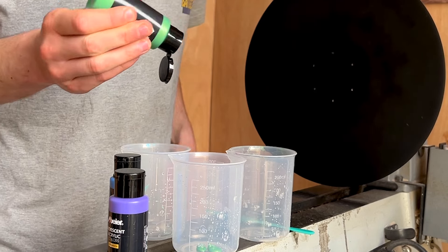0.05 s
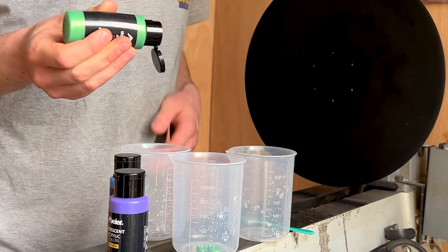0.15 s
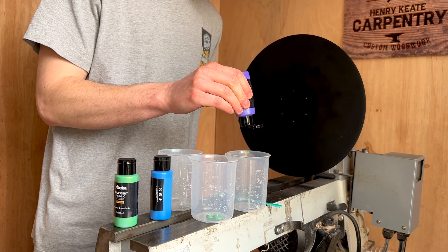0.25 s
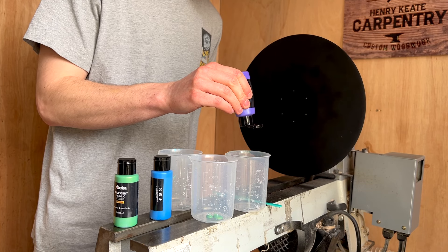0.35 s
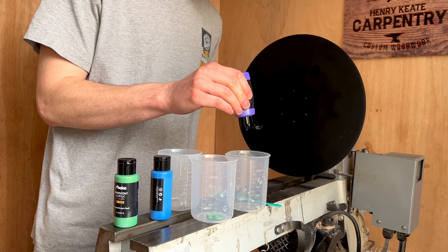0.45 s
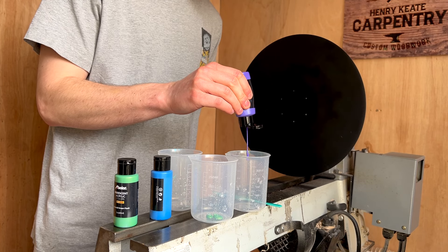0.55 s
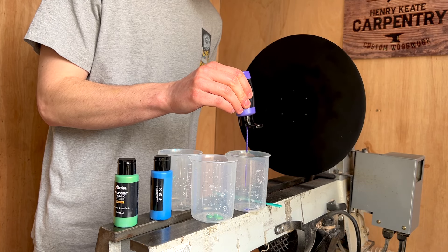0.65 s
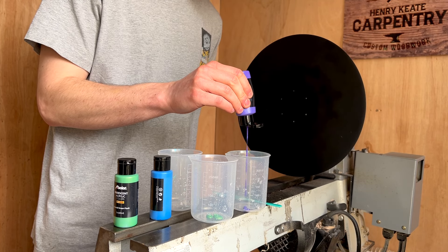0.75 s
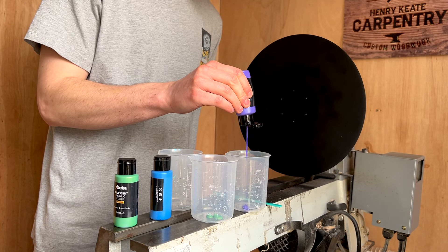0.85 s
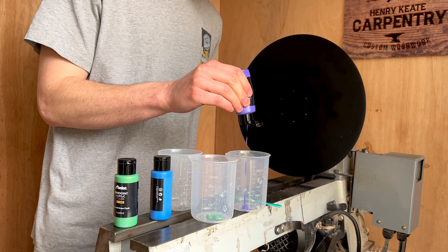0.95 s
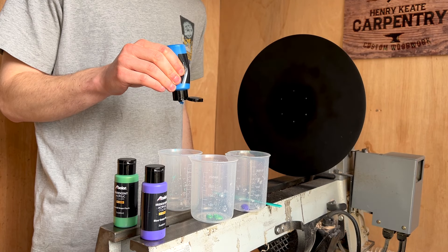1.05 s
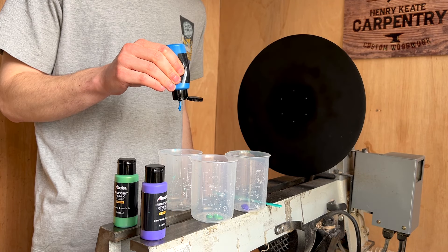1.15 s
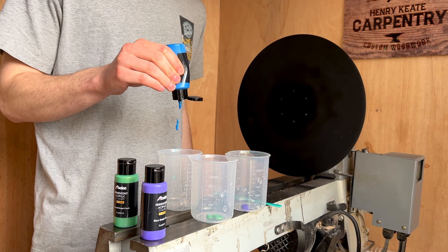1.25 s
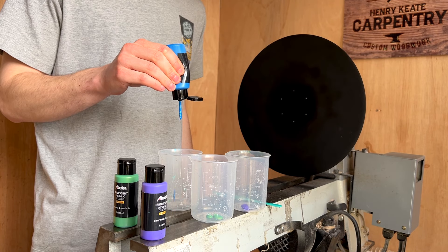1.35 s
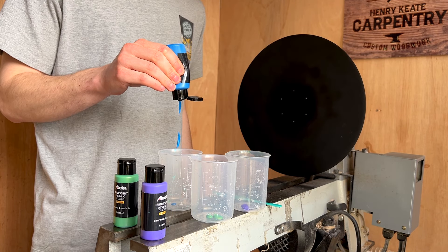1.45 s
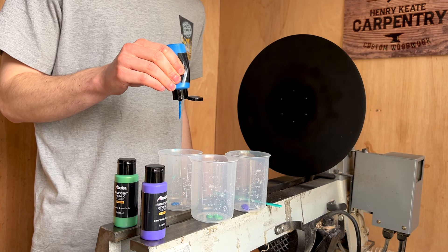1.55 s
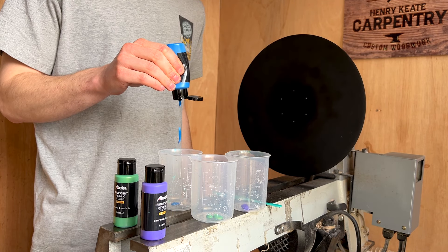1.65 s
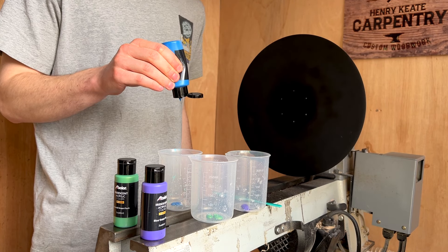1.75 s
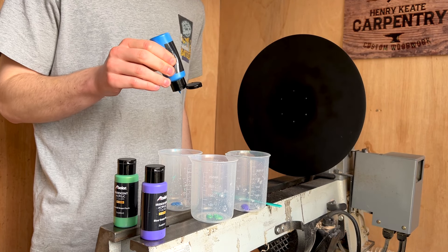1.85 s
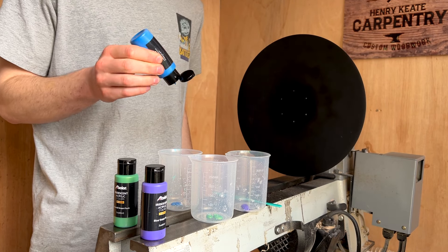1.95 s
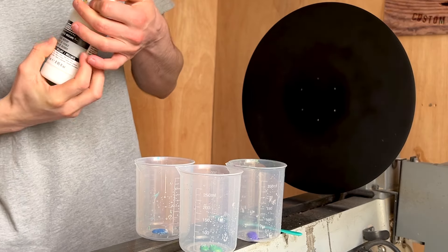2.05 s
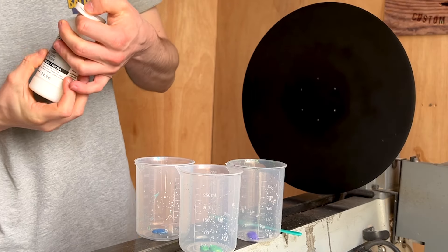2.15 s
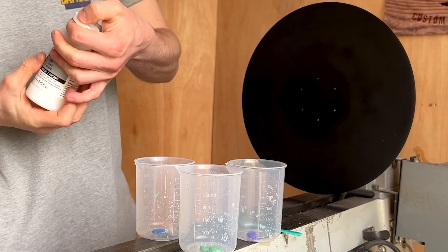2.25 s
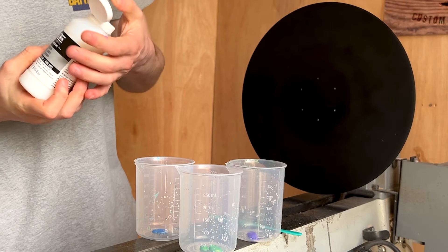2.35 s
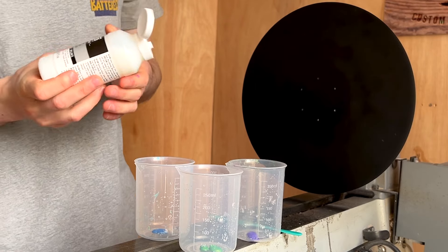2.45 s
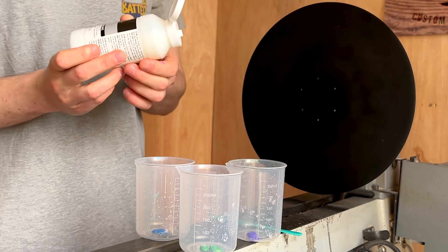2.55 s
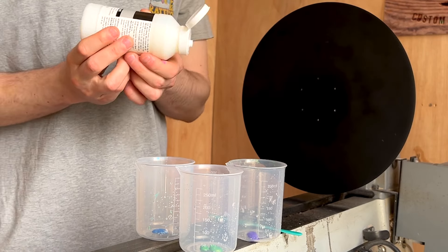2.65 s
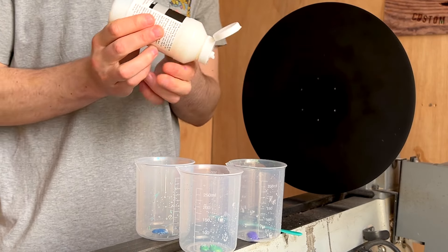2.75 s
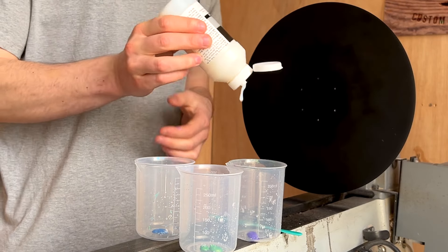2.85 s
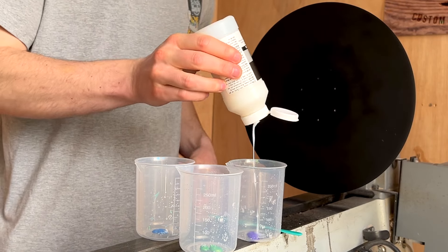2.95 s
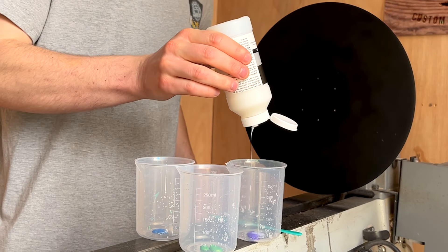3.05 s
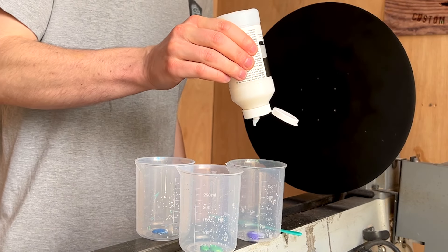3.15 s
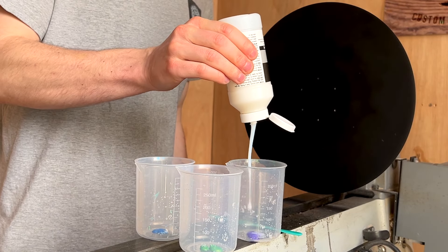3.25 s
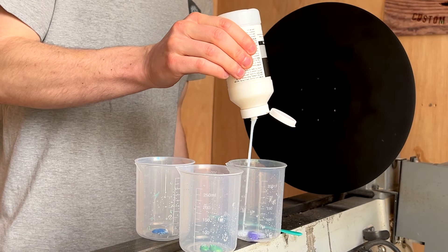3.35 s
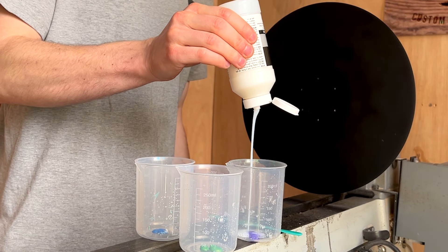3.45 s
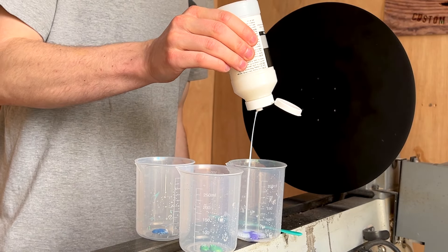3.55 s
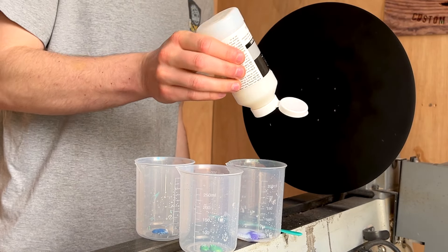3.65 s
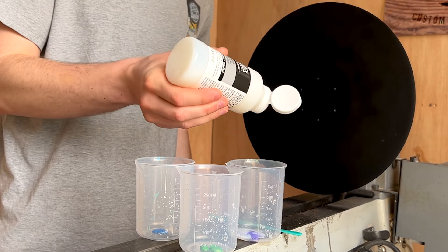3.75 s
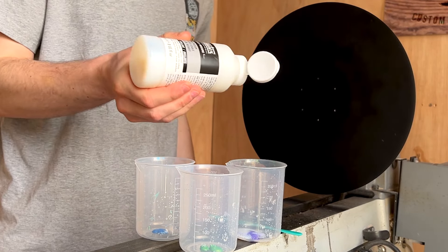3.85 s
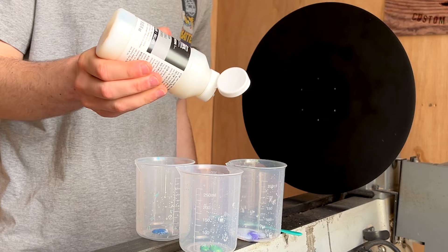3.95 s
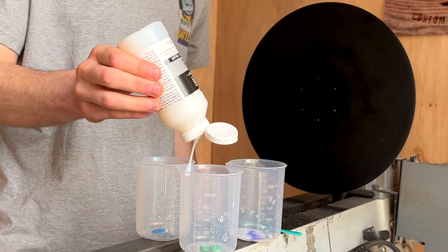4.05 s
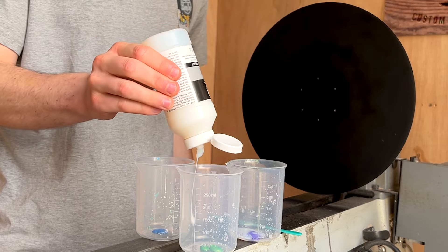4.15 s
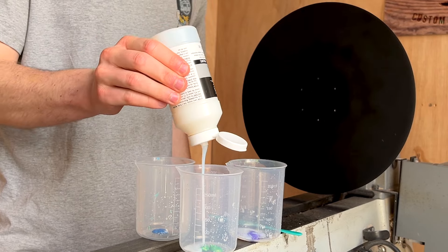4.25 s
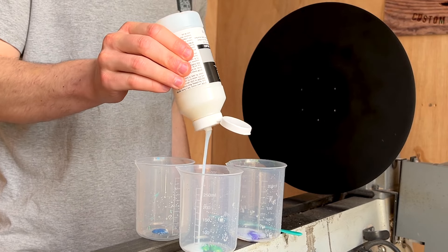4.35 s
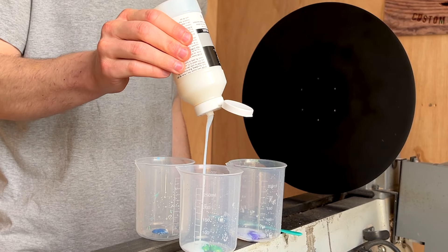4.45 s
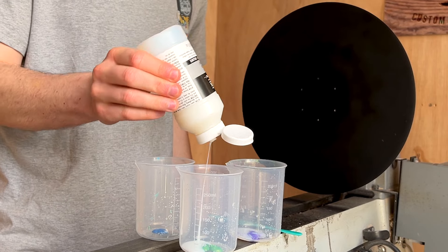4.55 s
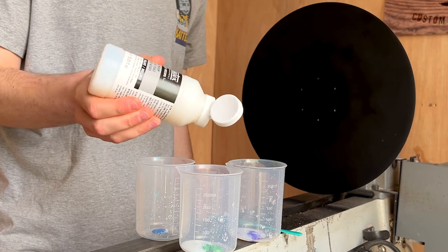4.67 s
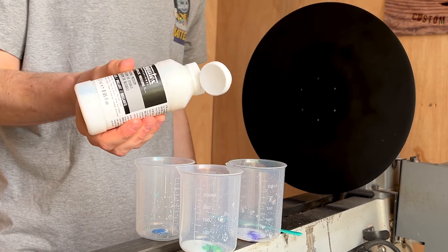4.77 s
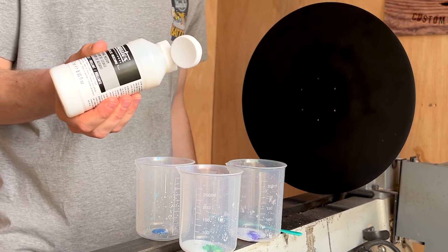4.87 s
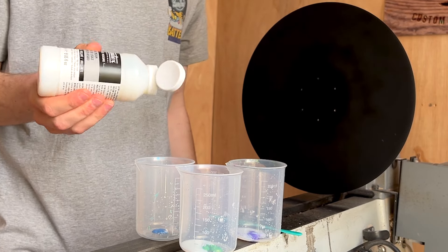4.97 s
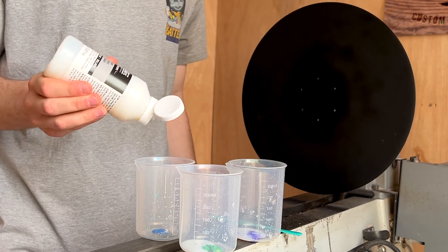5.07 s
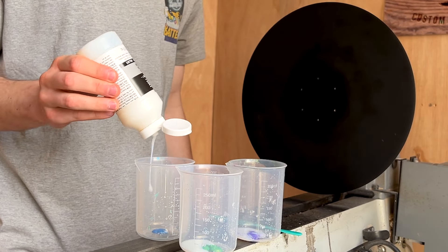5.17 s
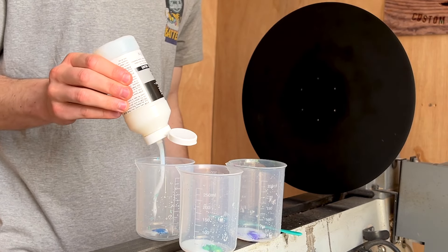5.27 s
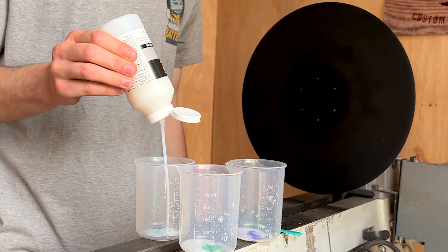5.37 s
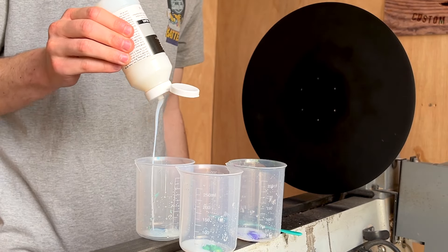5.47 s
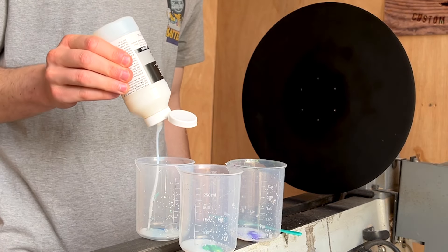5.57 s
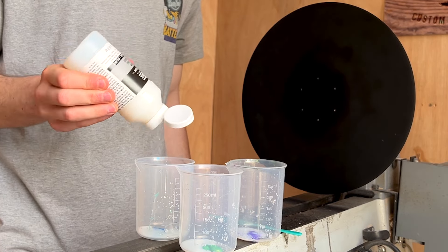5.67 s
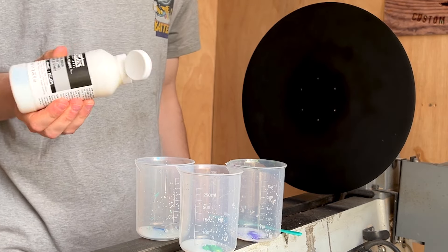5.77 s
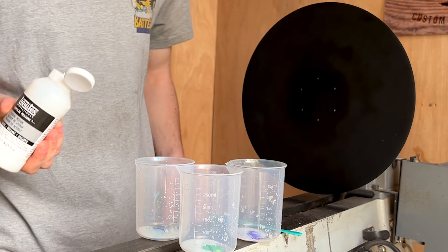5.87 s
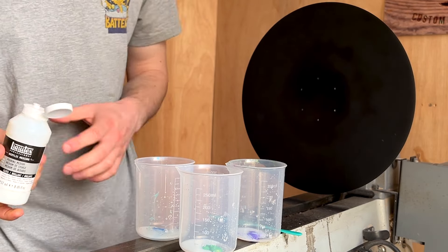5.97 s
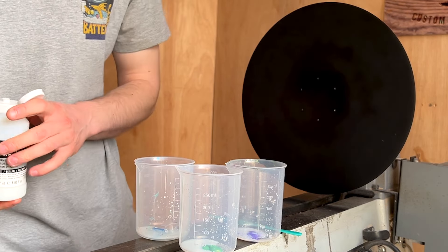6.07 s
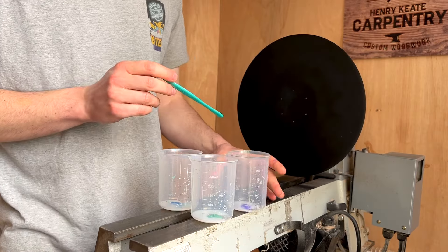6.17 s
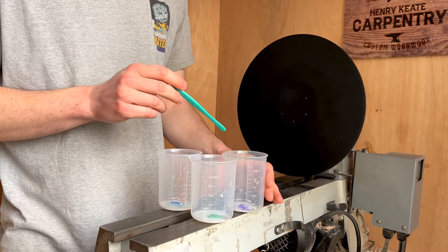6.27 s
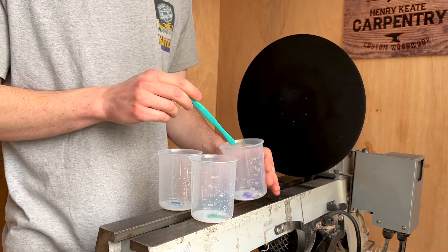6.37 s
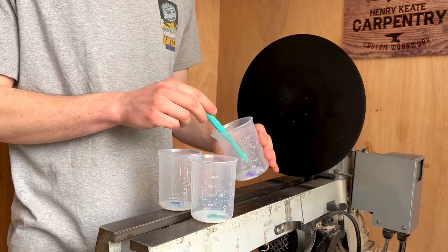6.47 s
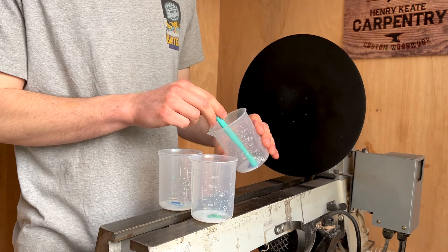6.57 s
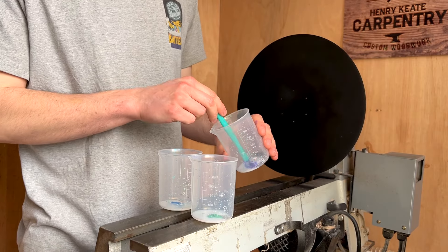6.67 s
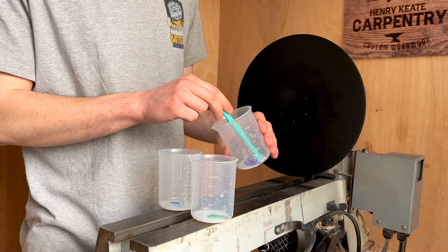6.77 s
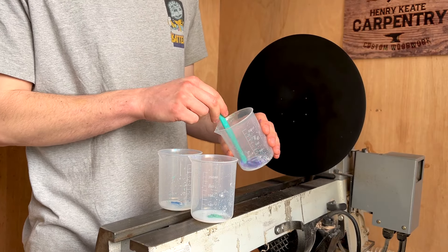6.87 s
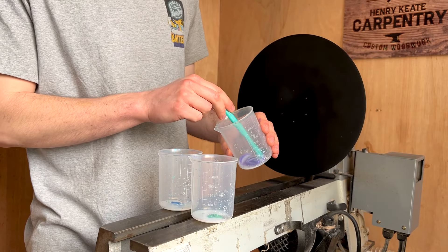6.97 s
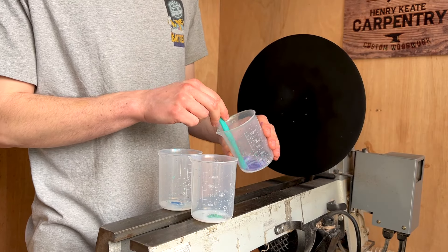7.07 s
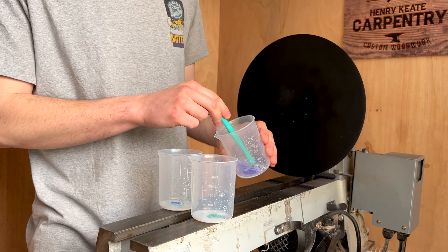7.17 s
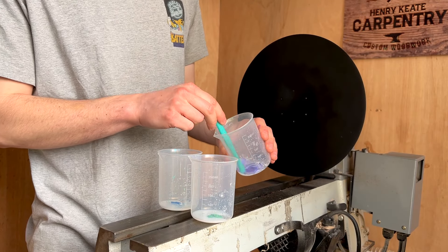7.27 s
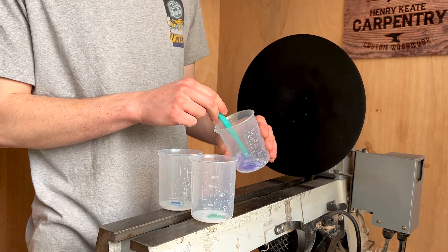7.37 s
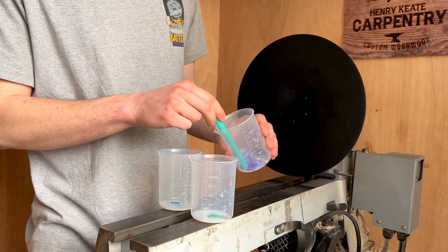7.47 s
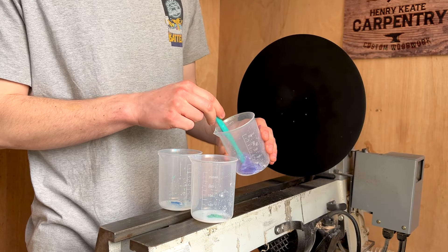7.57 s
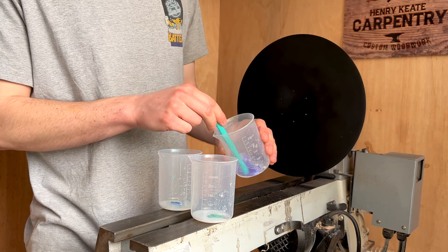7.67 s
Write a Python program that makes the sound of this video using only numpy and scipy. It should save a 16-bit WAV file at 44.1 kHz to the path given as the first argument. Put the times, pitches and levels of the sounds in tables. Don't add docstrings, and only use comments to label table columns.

```python
import sys
import numpy as np
from scipy import signal
from scipy.fft import rfft, irfft
from scipy.io import wavfile
from scipy.ndimage import uniform_filter1d

SR = 44100
rng = np.random.default_rng(int(sys.argv[2]) if len(sys.argv) > 2 else 0)


def file_out(sig):
    cols = np.atleast_2d(sig).T
    lim = np.clip(cols, -1, 1)
    pcm = np.round(lim * 32767).astype(np.int16)
    wavfile.write(sys.argv[1], SR, pcm)


def volts_from_decibels(level):
    exponent = np.asarray(level, float) / 20
    return 10 ** exponent


N = 340452
TIME = np.arange(N) / SR
BURST = 1500


def unit(x):
    return x / np.sqrt(np.mean(x ** 2))


def band(x, hz, width, order=1):
    edge = np.sqrt(hz ** 2 + width ** 2 / 4)
    edges = [edge - width / 2, min(edge + width / 2, SR / 2.1)]
    return signal.sosfilt(signal.butter(order, edges, "bandpass", fs=SR, output="sos"), x)


def spikes(times, db):
    return np.bincount((np.asarray(times) * SR).astype(int), volts_from_decibels(np.asarray(db)), N)[:N]


def grains(rate, spread_db):
    happens, sign, size = rng.random((3, N))
    clicks = (happens < rate / SR) * np.sign(sign - .5)
    return unit(clicks * volts_from_decibels(-spread_db * np.log(1 - size)))


def ring(x, modes, rise=.002):
    t = TIME[:SR // 2]
    y = sum(volts_from_decibels(db - 60 * t / t60) * np.sin(2 * np.pi * hz * t) for hz, db, t60 in modes)
    y = y * (1 - np.exp(-t / rise))
    return signal.fftconvolve(x, y / abs(y).max(), axes=-1)[:N]


def curve(table, column):
    rows = np.array(table)
    return np.interp(TIME, rows[:, 0], rows[:, column], -200, -200)


def walk(rate):
    hold = int(SR / rate)
    levels = np.repeat(rng.standard_normal(N // hold + 1), hold)
    return 1.22 * uniform_filter1d(levels, hold)[:N]


def swell(rows, part_db=0):
    s, db, rise, fade = np.array(rows)[:, :4, None].transpose(1, 0, 2)
    t = TIME[::32]
    level_db = db + part_db - 20 * np.maximum((s - t) / rise, (t - s) / fade)
    return np.interp(TIME, t, np.max(level_db, axis=0))


# frequency_hz, density_db
FAR_AIR = [(15, -46), (25, -3.5), (88, -6.5), (404, -31.5), (504, -35.5), (585, -34.5), (661, -40),
           (1420, -44.5), (1730, -45.5), (5110, -52.5), (9000, -56), (11700, -74), (19800, -120)]
NEAR_AIR = [(18, -66), (30, -25.5), (75, -3), (96, -1), (148, -2.5), (216, -5.5), (308, -16), (358, -14.5),
            (1810, -36.5), (3490, -39), (5240, -45), (10100, -44.5), (12700, -49), (16500, -82),
            (22000, -120)]
FAR_DB, NEAR_DB = -63, -66
# peak_s, level_db, rise_s, fade_s
SWELLS = [
    (0.94, -1, 4., 2.8),
    (2.15, 4.5, 0.4, 1.5),
    (2.79, 3.5, 5.3, 2.7),
    (4.17, 4.5, 0.98, 2.7),
    (6.15, 7.5, 1.7, 1.2),
    (6.53, -1, 2, 8.4),
]
REST_DB = -3


def air(shape, db, alike_hz):
    hz = np.maximum(np.fft.rfftfreq(N, 1 / SR), 1)
    shape_hz, shape_db = np.transpose(shape)
    gain = volts_from_decibels(np.interp(np.log(hz), np.log(shape_hz), shape_db))
    mid, side = rfft(rng.standard_normal((2, N))) * gain
    side = side * np.clip(hz / alike_hz, .05, 1)
    both = np.array([mid + side, mid - side])
    low = 1 / (1 + (hz / 370.0) ** 2)
    bass, rest = irfft(both * low, N), irfft(both * (1 - low), N)
    swell_db = np.maximum(swell(SWELLS), REST_DB) + 1.5 * walk(7.8)
    return (bass * volts_from_decibels(swell_db) + rest) * volts_from_decibels(db) / np.std(bass + rest)


# time_s, pitch_hz, level_db
HUM = [
    (4.4, 103, -80),
    (4.55, 100.9, -70),
    (5.3, 102, -67),
    (5.95, 105.3, -60),
    (6.13, 105.3, -66.5),
]


def hum():
    pitch_hz = np.maximum(curve(HUM, 1), 0) + 2.5 * walk(10.0)
    phase = 2 * np.pi * np.cumsum(pitch_hz) / SR
    return np.sqrt(2) * np.sin(phase) * volts_from_decibels(curve(HUM, 2) + 2.5 * walk(10))


# decay_t60_s, treble_t60_s, echo_db
FAR_ROOM = (0.17, 0.15, 4.3)
NEAR_ROOM = (0.1, 0.022, -0.015)


def shed(x, t60, treble_t60, wet_db):
    t = TIME[:SR // 3]
    noise = rng.standard_normal((2, len(t))) * (1 - np.exp(-t / 0.00022))
    apart = signal.sosfiltfilt(signal.butter(4, 6500., fs=SR, output="sos"), noise[1] - noise[0])
    noise = noise[0] + np.array([0 * apart, apart])
    dull = signal.sosfilt(signal.butter(1, 4000, fs=SR, output="sos"), noise)
    echo = dull * volts_from_decibels(-60 * t / t60) + (noise - dull) * volts_from_decibels(-60 * t / treble_t60)
    echo = echo * volts_from_decibels(wet_db) / np.sqrt(np.sum(echo ** 2, axis=1, keepdims=True))
    return x + signal.fftconvolve(x, echo, axes=1)[:, :N]


# start_s, level_db
POP = [
    (2.481, -28.5),
]
BUMPS = [
    (6.203, -29.5),
    (6.212, -25.5),
    (6.234, -31.5),
    (6.281, -42),
]
# frequency_hz, level_db, decay_t60_s
POP_MODES = [(146, -10, 0.23), (168, 12, 0.066), (234.5, 2.5, 0.12), (364, -13, 0.1), (545, -16.5, 0.11)]
BENCH_MODES = [(72.2, 1, 0.18), (102.4, 9.5, 0.056), (162.2, -1.5, 0.12), (227, -3.5, 0.054),
               (412, -43, 0.061)]


def thuds():
    pop = ring(spikes(*np.transpose(POP)), POP_MODES, rise=0.0044)
    bumps = ring(spikes(*np.transpose(BUMPS)), BENCH_MODES, rise=0.01)
    both = band(pop + bumps, 120.0, 520.0, order=2)
    return np.array([.85 * np.roll(both, shift=8), 1.1 * both])


def rub(level_db, hz, width, db):
    return unit(band(grains(rate=4000., spread_db=3.5), hz, width, order=2)) * volts_from_decibels(level_db + db)


# time_s, level_db
SQUEAK = [
    (2.62, -100),
    (2.645, -83.5),
    (2.68, -84),
    (2.7, -100),
]
# frequency_hz, width_hz, level_db
RUB_BANDS = [(554, 780, -2), (1430, 1520, -7), (6400, 10000, -3.5)]
# peak_s, level_db, rise_s, fade_s, dryness_db
RUBS_SOFT = [(0.016, -86.5, 0.025, 0.98, 1), (0.282, -81, .3, 0.0047, 7), (0.63, -83.5, 0.14, 0.12, -1),
             (1.03, -84, .02, 0.09, -1), (2.047, -69, 0.014, 0.11, 10), (2.134, -71.5, .16, 0.2, -15),
             (2.184, -71, 0.044, 0.26, 5), (2.3, -72.5, 0.27, 0.07, 3), (2.656, -73.5, 0.059, 0.15, -18),
             (2.766, -73, .025, 0.062, 3.5), (2.816, -76, 0.22, 0.12, 15), (2.9, -79.5, .17, .01, -13),
             (5.942, -66.5, 0.03, 0.044, 9), (6.042, -69, 0.048, 0.097, 6),
             (6.255, -58.5, 0.058, 0.067, -9), (6.293, -64, .06, 0.067, 16), (6.448, -78.5, 0.9, 0.15, 20)]
# peak_s, level_db, rise_s, fade_s, dryness_db
RUBS_HARD = [
    (0.498, -70, 0.0042, 0.076, -24),
    (0.65, -71, 0.011, 0.02, -12),
    (1.681, -49.5, 0.0067, 0.053, -2.8),
    (1.704, -46, 0.02, 0.026, -19),
    (6.134, -65, .003, 0.22, 5),
    (2.331, -62, .016, .03, 33),
    (6.098, -68.5, 0.045, 0.034, 20),
    (6.204, -55.5, 0.075, 0.025, -1.5),
]
SOFT_BODY_DB, HARD_BODY_DB, BODY_PER_DRY = -14, 3, 0.22


def rubs():
    squeak = unit(band(rng.standard_normal(N), 2850.0, 98.0)) * volts_from_decibels(curve(SQUEAK, 1))
    rows = RUBS_SOFT + RUBS_HARD
    dry_db = np.array(rows)[:, 4:]
    body_db = np.array([[SOFT_BODY_DB]] * len(RUBS_SOFT) + [[HARD_BODY_DB]] * len(RUBS_HARD))
    hollow_db = -np.maximum(dry_db, 0)
    body_db = body_db - BODY_PER_DRY * np.maximum(dry_db, 0)
    hiss_db = np.minimum(dry_db, 0)
    parts = zip((hollow_db, body_db, hiss_db), RUB_BANDS)
    return squeak + sum(rub(swell(rows, part_db), *settings) for part_db, settings in parts)


# start_s, level_db, ring_hz, hollow_db, snap_db
DULL_TICKS = [(0.974, -76, 1500, 0, -14), (1.3787, -53, 1520, -5.5, -16.5), (2.169, -67, 1340, 6.5, -15),
              (2.2605, -54.5, 3300, -18, -18), (2.9657, -47.5, 2090, -25, -24),
              (3.0844, -71, 2070, -14, -14), (3.1064, -67, 1810, -20, -15), (3.3033, -48, 1800, -44, -13),
              (3.5857, -67, 1703, -14, -20), (3.666, -64.5, 1420, -22, -21), (4.264, -49.5, 2420, -31, -14),
              (4.6159, -72.5, 1230, 7.5, -14), (5.234, -58.5, 2680, -19, -9.5), (5.8596, -73, 1858, 2.5, 9),
              (5.9347, -64, 1575, 12.5, -1), (6.0311, -74.5, 1560, 26.5, -2), (6.083, -46, 2900, -17, -16),
              (6.47, -95, 1490, -16, 17)]
CRISP_TICKS = [(0.4903, -62.5, 1500, -3, -23), (0.5432, -72, 1970, 11.5, -14),
               (0.6467, -58.5, 2850, -5, -25), (1.0266, -66.5, 1430, -14, -17),
               (1.0694, -81.5, 1770, -12, 0.3), (1.2594, -87, 1240, -5, 2), (1.5609, -63, 1360, -9, -17),
               (2.3291, -58.5, 2490, 1, -12), (2.4773, -52, 2680, -7, -20.5), (2.5694, -76, 1450, 17, -6),
               (2.7644, -71, 2800, 5, -7), (3.4136, -64, 1710, -18, -33), (3.6346, -71, 1680, -5, -28),
               (4.0364, -76.5, 1280, 13, -4.5), (5.0513, -78.5, 1715, -3, 4)]
DULL_FIZZ_DB, CRISP_FIZZ_DB = -7, 8.5


def ticks():
    out, t = np.zeros(N + BURST), TIME[:BURST]
    rows = [(*r, DULL_FIZZ_DB) for r in DULL_TICKS] + [(*r, CRISP_FIZZ_DB) for r in CRISP_TICKS]
    noises = rng.standard_normal((len(rows), BURST))
    for (s, db, hz, hollow_db, snap_db, fizz_db), noise in zip(rows, noises):
        burst = 0.79 * noise * np.exp(-t / 0.0061) * (1 - np.exp(-t / 0.00062))
        partner_hz = (1.55 if hz < 1700 else .72) * hz
        rings = np.sin(2 * np.pi * hz * t) + 0.57 * np.sin(2 * np.pi * partner_hz * t)
        body = 1.52 * rings * np.exp(-t * hz / 2.4) + 0.93 * band(burst, hz, 940.0, order=2)
        body = band(body, 0.16 * hz + 1570.0, 2300.0, order=2)
        hollow = volts_from_decibels(hollow_db) * np.sin(2 * np.pi * 710.0 * t) * np.exp(-t / 0.0023)
        snap = 3.55 * volts_from_decibels(snap_db) * band(burst, 4870.0, 2500.0, order=2)
        fizz = 2.17 * volts_from_decibels(snap_db + fizz_db) * band(burst, 10600.0, 6000.0, order=2)
        click = (body + hollow + snap + fizz) * volts_from_decibels(db + 1.5) * (1 - np.exp(-t / 0.00084))
        first = int(s * SR)
        out[first:first + BURST] += click
    return out[:N] * volts_from_decibels(np.array([[1.5], [-1.5]]))


def touches(times, chatter):
    chance = rng.random((len(times), 2, BURST))
    rebounds = (chance[:, 0] < .06) * (chance[:, 1] - .5) * np.exp(-TIME[:BURST] / chatter)
    touch = rebounds + .5 * (TIME[:BURST] == 0)
    place = (times * SR).astype(int)[:, None] + np.arange(BURST)
    return touch / np.sqrt(np.sum(touch ** 2, axis=1, keepdims=True)), place


def strike(touch, place, db):
    return np.bincount(place.ravel(), (touch * volts_from_decibels(db)[:, None]).ravel(), N)[:N]


def plastic(force, modes, grip_db=1.56):
    y = 0
    for k, (hz, width, db) in enumerate(modes):
        y = y + (-1) ** k * band(force * volts_from_decibels(db + grip_db * walk(9)), hz, width)
    return y


# start_s, note_db, note_hz, click_db
TAPS = [(6.149, -48, 613, -14), (6.174, -46, 710, -20), (6.251, -41.5, 730, -15), (6.287, -45, 724, -11),
        (6.319, -73, 810, 4), (6.545, -10.5, 802, -17.5), (6.685, -21.5, 918, -18),
        (7.004, -25, 827, -15.5), (7.238, -43.5, 706, 6.5), (7.302, -18, 730, -19), (7.316, -27, 795, -13),
        (7.439, -19.5, 868, -18), (7.529, -49, 744, 4.5), (7.654, -25.5, 673, -15)]
# start_s, note_db, note_hz, click_db
CLACKS = [(6.737, -50, 930, -4), (6.864, -20, 890, -14.5), (6.868, -39.5, 700, 6), (6.877, -25.5, 716, -8),
          (6.899, -40, 760, -1), (6.924, -37, 900, -14), (7.066, -24, 690, -16), (7.088, -15.5, 648, -16.5),
          (7.096, -40, 784, 3.5), (7.278, -26.5, 730, -16.5), (7.486, -33, 830, -13),
          (7.496, -22.5, 836, -17.5), (7.295, -19, 690, -14), (7.506, -15.5, 663, -15),
          (7.69, -27.5, 820, -18), (7.707, -34.5, 750, -8)]
# base_db, rim_db, wall_db
TAP_PARTS = (0.68, -10, 0.26)
CLACK_PARTS = (-2.5, 0.27, -3)
# peak_s, level_db, rise_s, fade_s
DRAGS = [(6.55, -43.5, 0.0041, 0.12), (6.682, -47.5, 0.0067, 0.15), (6.864, -44.5, 0.024, 0.043),
         (7.008, -49, 0.036, 0.022), (6.77, -47.5, 0.095, 0.038), (7.098, -35.5, 0.028, 0.057),
         (7.234, -48.5, .004, .3), (7.312, -45.5, 0.1, .062), (7.438, -50, 0.003, 0.045),
         (7.508, -35, 0.037, 0.058), (7.65, -41, .003, 0.21)]
# start_s, note_db
DIPS = [
    (6.533, -40.5),
    (6.855, -42),
    (7.427, -48),
    (7.643, -58),
]
# frequency_hz, level_db, decay_t60_s
NOTE_LEFT = [(655, -12.5, 0.15), (787.1, 0, 0.12), (846.7, 0, 0.12), (903.3, -6, 0.12), (962, -9.5, 0.11),
             (1095, -5.5, .12)]
NOTE_RIGHT = [(662.5, -14.5, 0.19), (744.3, 6.5, 0.095), (804.5, 1.5, 0.16), (881, -7, 0.21),
              (987, -12, 0.16), (1138, -7, 0.11), (1137, -27, 0.11)]
# frequency_hz, width_hz, level_db
BASE = [(448, 400, -8.5), (1540, 490, -1.5), (2127, 610, -3.5), (2180, 420, -4)]
RIM = [(3010, 165, -4.5), (3150, 63, 6.5), (3330, 220, -3)]
WALL = [(3780, 260, -2.5), (4700, 440, -6), (5390, 330, -5.5), (6820, 1220, -8), (8050, 3800, -12.5),
        (10960, 2900, -18)]
LIP_HZ = (3190, 3235.)
LIP_WIDTH_HZ, LIP_DB = 30, 13


def beaker():
    s, note_db, note_hz, click_db = np.transpose(TAPS + CLACKS)
    shares = np.transpose([TAP_PARTS] * len(TAPS) + [CLACK_PARTS] * len(CLACKS))
    base_db, rim_db, wall_db = click_db + shares
    touch, place = touches(s, chatter=0.0026)
    slip = grains(rate=1400.0, spread_db=2.5) * volts_from_decibels(swell(DRAGS) + 4.38 * walk(40))
    fade = np.exp(-TIME[:BURST] / 0.002)
    column = 2 * np.cos(2 * np.pi * note_hz[:, None] * TIME[:BURST]) * fade / fade.sum()
    push = strike(column, place, note_db + 1.5) + spikes(*np.transpose(DIPS)) + slip * volts_from_decibels(-28.5)
    note = np.array([ring(push, NOTE_LEFT, rise=0.0013), ring(push, NOTE_RIGHT, rise=0.0022)])
    base = plastic(strike(touch, place, note_db + base_db + 32.0) + slip * volts_from_decibels(-6.5), BASE)
    edge = strike(touch, place, note_db + rim_db + 32.5) + slip * volts_from_decibels(-4.5)
    rim = plastic(edge, RIM)
    lip = np.array([band(edge, hz, LIP_WIDTH_HZ) for hz in LIP_HZ])
    note = note + volts_from_decibels(LIP_DB) * lip * [[1.3], [.8]]
    note = note + volts_from_decibels(LIP_DB - 12) * band(edge, 3925., 32.0) * [[1.3], [.7]]
    wall = plastic(strike(touch, place, note_db + wall_db + 32.0) + slip * volts_from_decibels(-1.5), WALL)
    return note, base + (rim + wall) * volts_from_decibels(np.array([[2.2], [-2.2]]))


# start_s, end_s
NEAR_S = (2.043, 6.131)


def scene():
    note, wall = beaker()
    near = (TIME > NEAR_S[0]) & (TIME < NEAR_S[1])
    near_floor = air(NEAR_AIR, NEAR_DB, alike_hz=1110.0)
    floor = np.where(near, near_floor, air(FAR_AIR, FAR_DB, alike_hz=740.0))
    hands = wall + ticks() + rubs()
    far = shed(hands * ~near, *FAR_ROOM)
    far = far - 2 * band(far, 9850.0, 3300.0) * np.array([[1], [0]])
    shade = signal.butter(2, [9000., 11000.], "bandstop", fs=SR, output="sos")
    far = 0.16 * far + signal.sosfilt(shade, far)
    hands = np.where(near, shed(hands * near, *NEAR_ROOM), far)
    return note + hands + thuds() + hum() + floor


def low_pass(x):
    return signal.sosfilt(signal.butter(12, 16460, fs=SR, output="sos"), x)


def record(dry):
    top = signal.ellip(10, .2, 70, 15750, fs=SR, output="sos")
    bottom = signal.butter(2, 28, "highpass", fs=SR, output="sos")
    mix = signal.sosfilt(np.vstack([top, bottom]), dry)
    return low_pass(mix)


dry = scene()
out = record(dry)
file_out(out)
```